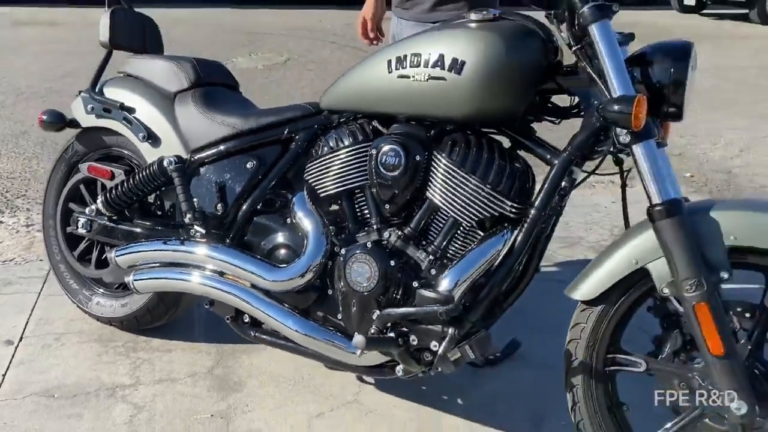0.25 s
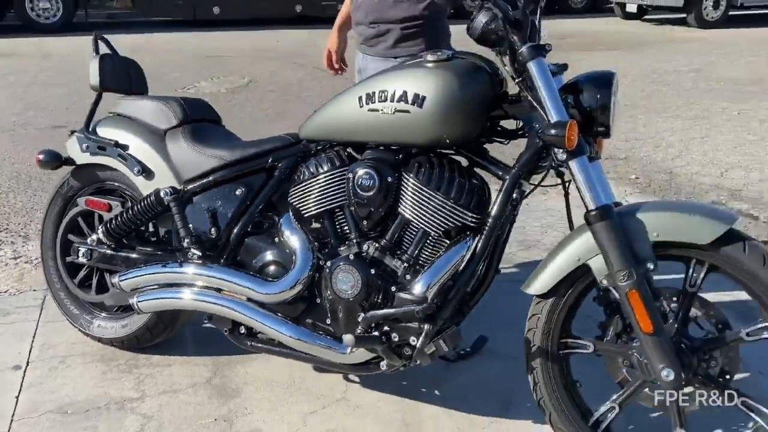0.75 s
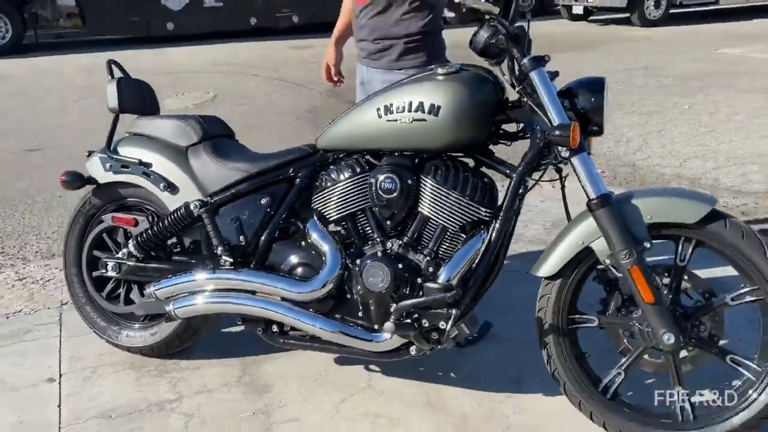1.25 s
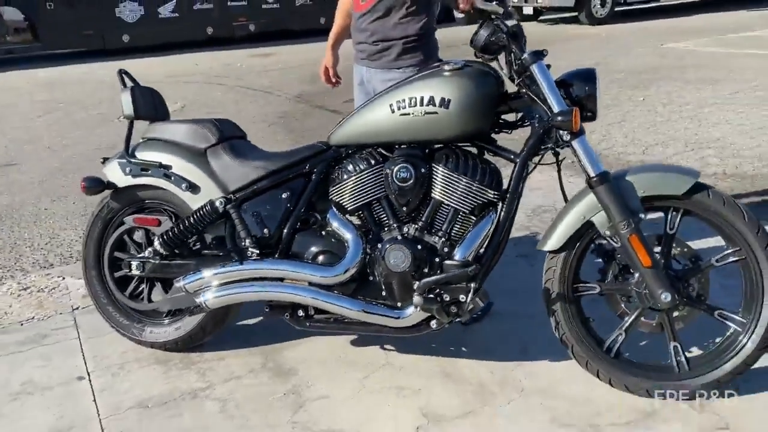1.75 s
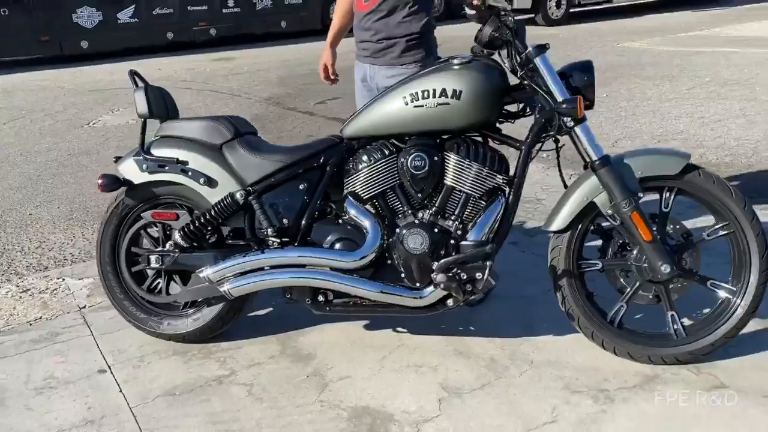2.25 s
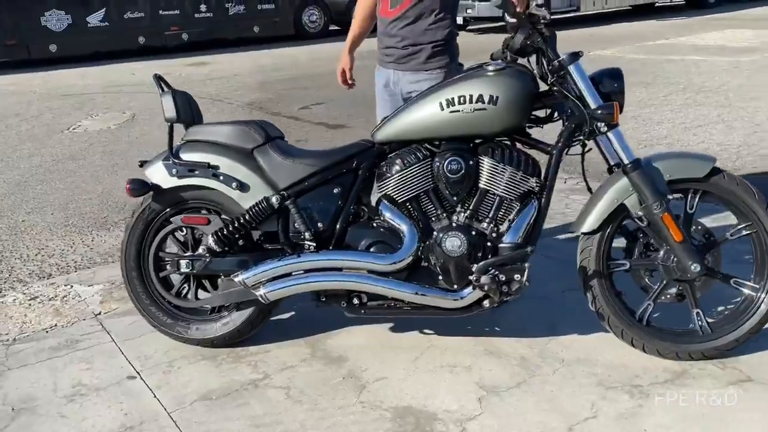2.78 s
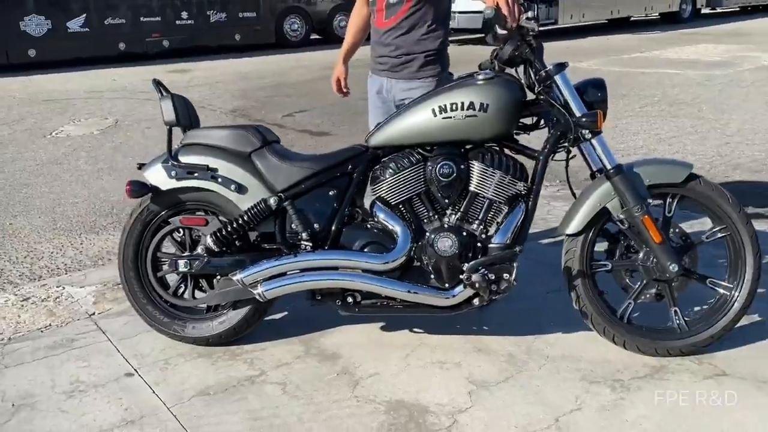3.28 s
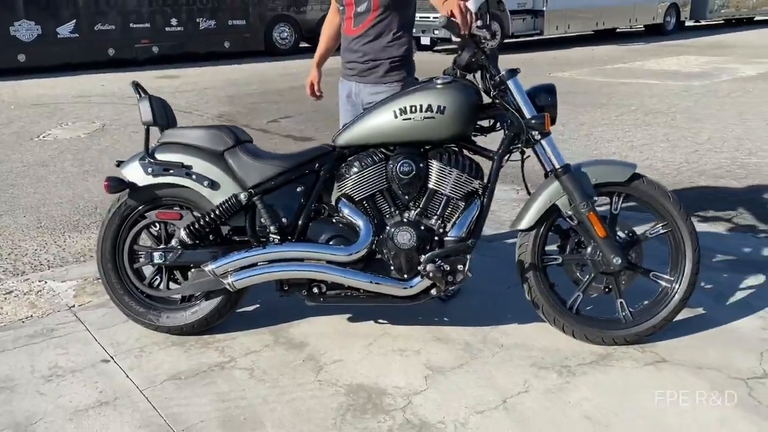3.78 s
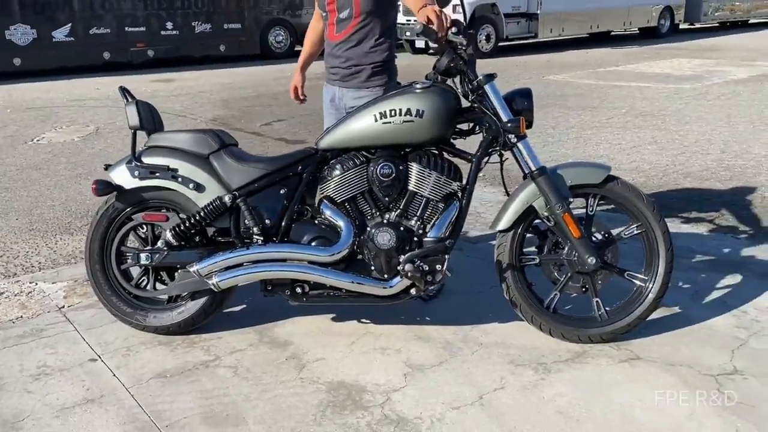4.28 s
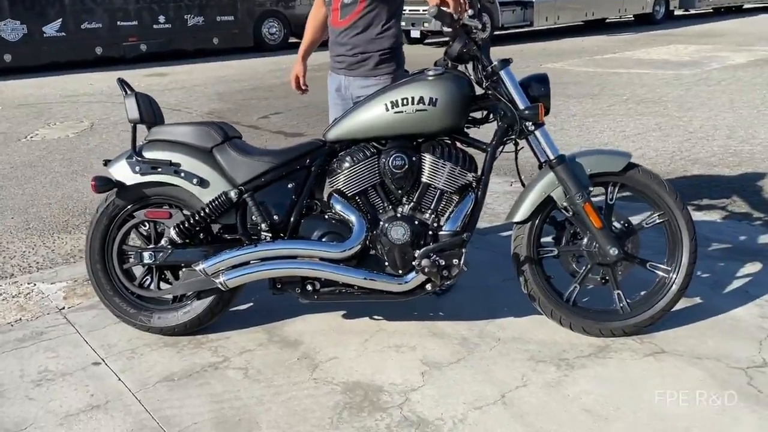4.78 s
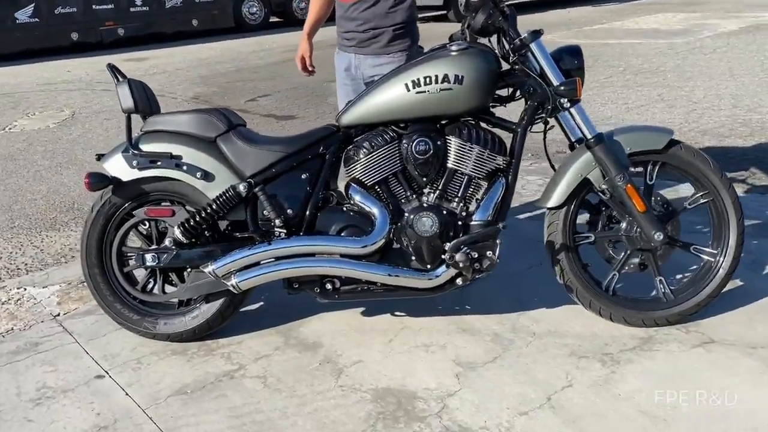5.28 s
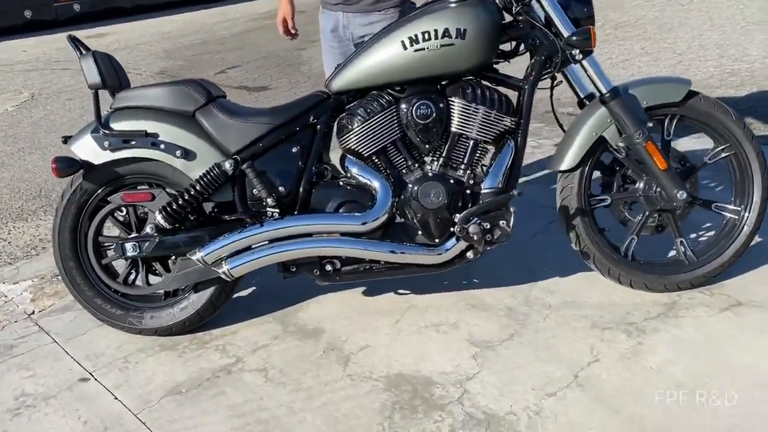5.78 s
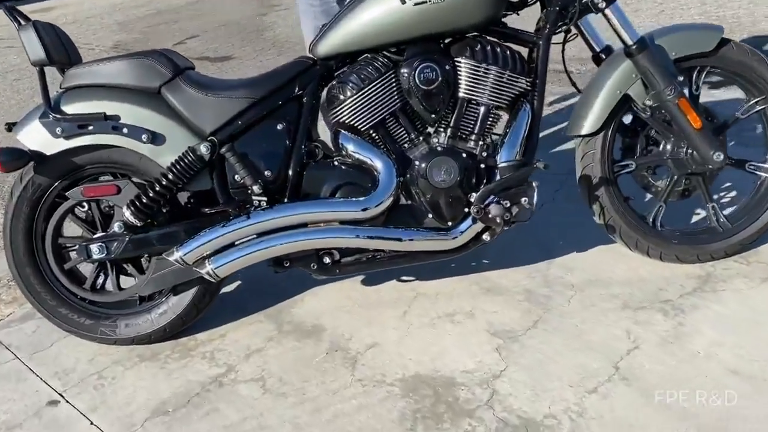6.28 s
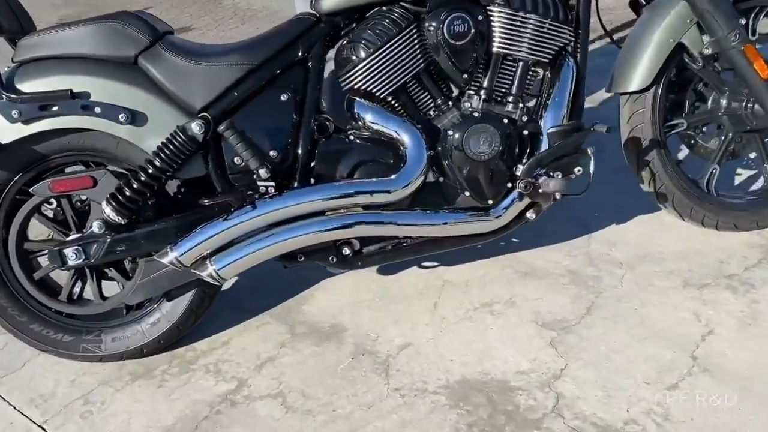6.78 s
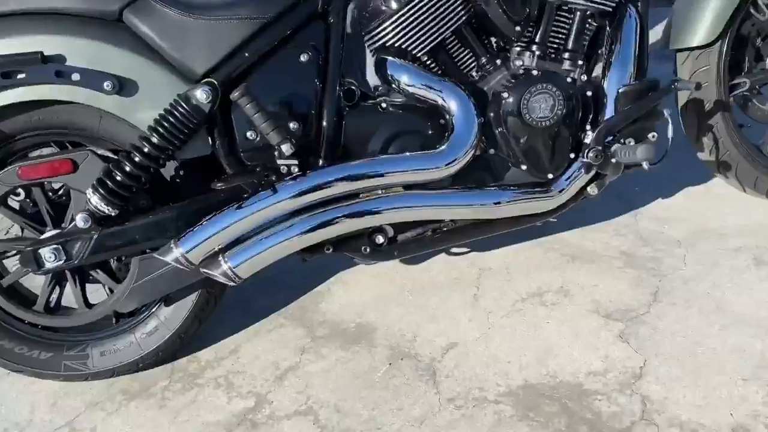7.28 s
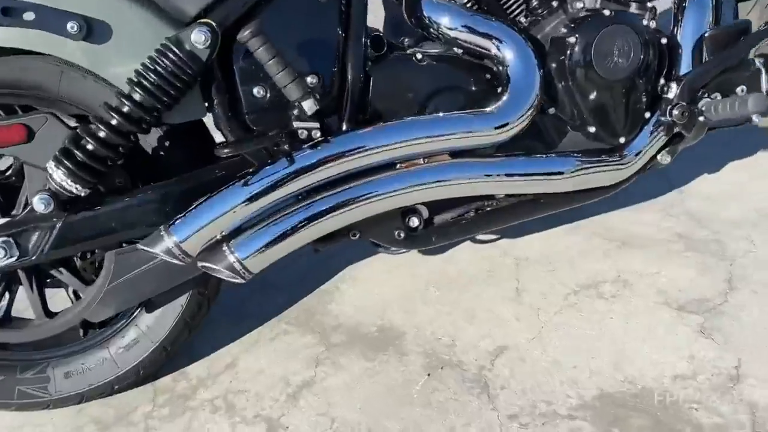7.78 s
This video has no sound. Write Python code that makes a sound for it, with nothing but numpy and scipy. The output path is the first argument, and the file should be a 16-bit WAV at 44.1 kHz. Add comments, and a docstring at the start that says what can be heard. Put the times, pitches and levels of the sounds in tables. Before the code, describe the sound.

Loud, raspy motorcycle revs in quick bursts on a concrete lot, each falling back to a soft uneven lope, the last cut off mid-bark.

```python
"""A big V-twin motorcycle with two open pipes stands on concrete, in stereo, over a faint distant street.
It lopes briefly, then barks in two quick blips, a longer one near 2 s, three close together around 4 s,
one at 5.5 s and a last at 7.6 s that is still barking at the end. Each firing rings its pipe and tears
out a burst of gas noise. Between blips the engine runs down in a soft lope, stumbling just after the
throttle shuts, with a pop after four of the blips. Parked trucks answer faintly."""
import sys
import numpy as np
from scipy import signal
from scipy.fft import rfft, irfft, next_fast_len
from scipy.io import wavfile
from scipy.ndimage import uniform_filter1d

SR = 44100
rng = np.random.default_rng(int(sys.argv[2]) if len(sys.argv) > 2 else 0)


def log_audio(samples):
    """Write samples as a 16-bit WAV file to the path given in sys.argv[1]."""
    # one column per channel
    frames = np.atleast_2d(samples).T
    # limit to full scale, then quantise
    limited = np.clip(frames, -1, 1)
    pcm = np.round(limited * 32767).astype(np.int16)
    wavfile.write(sys.argv[1], SR, pcm)


N = 354563

# throttle blips: (bark starts [s], bark ends [s], grip turns earlier by [s], twist takes [s],
# push [cycles/s per s], soft start before each layer's share [dB], stumble afterwards [s])
BLIPS = [(.2, .435, .127, .249, 109.6, 0, .145), (.615, .955, .116, .126, 84.3, 2, .205),
         (1.925, 2.42, .128, .188, 93.7, 10, .21), (3.65, 3.8, .089, .143, 90.7, 8, .17),
         (3.985, 4.145, .165, .125, 48.5, 12, .1), (4.27, 4.69, .144, .226, 87.2, 13, .19),
         (5.475, 5.99, .128, .261, 93.3, 10, .23), (7.615, 8.2, .007, .168, 109.6, 0, 0)]
# the grip is let go this long before the bark ends; time constant of the push dying away
RELEASE_S, PUSH_DIES_S = .127, .092
# engine speed in four-stroke cycles/s: at first, at idle, and the span above idle where idle control helps
FIRST_RATE, IDLE_RATE, IDLE_SPAN = 18.6, 12.8, 5.3
# what slows the crank: friction [cycles/s per s] and pumping drag [per s]
FRICTION, DRAG = 10.2, .64
# cycles from the start to the front cylinder's firing, and from there to the rear one's
FIRST_FIRING, REAR_LAG = .72, .425

# throttle open: (engine speed [cycles/s], pipe boom [dB], gas rasp [dB], hiss [dB]), before cylinder trims
OPEN_LEVELS = [(13, -17.5, -24, -26), (20, -12, -19.5, -25), (31.6, -11, -17, -25.5),
               (43.5, -11, -16.5, -26.5)]
# throttle shut: (engine speed [cycles/s], pipe boom [dB], gas rasp [dB], hiss [dB]), before trims
SHUT_LEVELS = [(13.55, -39.5, -52.5, -64), (16.07, -33, -43.5, -54.5), (19.1, -29.5, -41, -48.5),
               (30.2, -19, -32.5, -39.5), (37, -15.5, -29.5, -37.5)]
# a soft start fills to full strength in this time
FILL_S = 0.22
# share of the soft start taken by (boom, rasp, hiss) [ratio]
SOFT_SHARE = (0.53, 0.96, 1.1)
# how far (boom, rasp, hiss) have sunk by the end of a stumble [dB]
STARVE_DB = (0, 3, 4)
# the lope by the place of the microphone: (time [s], boom [dB], gas noise [dB])
MIC_PLACE = [(0, 9, 12.5), (.7, 1, 3), (1.6, -0.5, 4), (3.4, -0.5, 2), (4.2, 0.5, 3.5), (5.4, 0, 3),
             (6.4, 1, 4), (7.3, 4.5, 7), (7.6, -1.5, -3)]
# how hot the pipe gas is under throttle: (engine speed [cycles/s], heat [0-1])
OPEN_HEAT = [(16, 0.22), (26, 0.86), (35, 0.83)]
# the same while stumbling, before it cools: (engine speed [cycles/s], heat [0-1])
STUMBLE_HEAT = [(22, 0.071), (30, 0.65), (40, 1)]
# the same when coasting: (engine speed [cycles/s], heat [0-1])
SHUT_HEAT = [(15, 0.009), (24, 0.038), (40, 0.47)]

# standing waves of each pipe, hot and cool: (frequency [Hz], width [Hz], relative level [dB])
FRONT_HOT = [(82.8, 136, -6.5), (132, 46.7, 6.5), (178, 63.4, 4.5), (356, 99, -8), (497, 49, -17.5),
             (920, 330, -22), (1220, 250, -32), (1510, 50, -39)]
REAR_HOT = [(73.3, 53.5, -3.5), (108.2, 64.5, 0), (222, 58, -1.5), (318, 47, -6.5), (475, 35, -15.5),
            (852, 20, -14.5), (1064, 84, -22.5), (1640, 62, -18)]
FRONT_COOL = [(95.8, 16.1, 2.5), (164.2, 35, -3.5), (278.3, 28, -10.5), (318, 97, -29)]
REAR_COOL = [(88.4, 16.3, 1), (169.4, 25.7, -5), (194, 27, -6.5), (280, 53, -16)]

# colour of turbulent gas under throttle: (frequency [Hz], relative density [dB per Hz])
RASP = [(100, -32.5), (300, 6.5), (450, -1.5), (630, -5.5), (870, 1), (1050, 2), (1250, -2), (1530, 5),
        (1800, -3), (2400, -4), (3200, -22.5), (6000, -79.5)]
# colour of the soft gas with the throttle shut: (frequency [Hz], relative density [dB per Hz])
SOFT_RASP = [(100, -48.5), (300, 9), (420, -5), (620, -5), (880, -1.5), (1150, -0.5), (1450, -1),
             (1750, -2.5), (2050, -4), (2500, -12), (3300, -17), (6000, -49)]
# colour of the gas hiss: (frequency [Hz], relative density [dB per Hz])
HISS = [(1200, -19), (2400, -5.5), (3300, -0.5), (4400, 0.5), (5400, -1.5), (6200, -6), (7500, -4),
        (8400, -14), (9500, -6.5), (13000, -11.5), (14500, -12.5), (16000, -18)]
# afterfire in the pipes: (time [s], peak level before trim [dB])
POPS = [(0.491, -14.5), (2.439, -7), (4.86, -10.5), (6.226, -23)]

# between the two microphones: (frequency [Hz], left leads by [rad])
MIC_LEAD = [(150, 0), (600, .3), (1210, .9), (2500, 3.3), (3270, 6.8), (6720, 6.4), (7840, 3.7), (9390, .5),
            (12900, 0), (14600, -2.5)]
# between the two microphones: (frequency [Hz], left over right [dB])
MIC_TILT = [(380, -0.5), (700, 2.5), (1290, -1), (2380, -1), (4400, 10), (8100, -0.5), (15000, 0.5)]
# between the two microphones: (frequency [Hz], likeness [0-1])
MIC_LIKENESS = [(300, 1), (1000, 0.96), (2000, 0.67), (4000, 0.4), (12000, 0.43)]
# echo around the yard: (frequency [Hz], time to fall 60 dB [s])
YARD_DECAY = [(100, 0.028), (1500, 1), (12000, 0.27)]
# colour of the distant street: (frequency [Hz], relative density [dB per Hz])
STREET = [(25, 2.5), (70, -22), (140, 8.5), (400, -20), (1000, -10.5), (4000, -35), (15000, -47)]
TOP_HZ = 16100  # band limit of the recorder


def engine_speed():
    """Cycles/s every millisecond: throttle pushes the flywheel, friction and drag run it down to idle."""
    t = np.arange(N * 1000 // SR + 2) / 1000
    push = np.zeros(len(t))
    for start, end, early, twist, force, _, _ in BLIPS:
        opening = np.clip((t - start + early) / twist, 0, 1)
        closing = np.exp(-np.maximum(t - end + RELEASE_S, 0) / PUSH_DIES_S)
        push += force * opening * closing
    rate, rates = FIRST_RATE, []
    for force in push:
        idle_control = min(1, (rate - IDLE_RATE) / IDLE_SPAN)
        rate += (force - (FRICTION + DRAG * rate) * idle_control) * t[1]
        rates.append(rate)
    return t, np.array(rates)


def firings(rear):
    """Times and cycle rates at which one cylinder fires; the uneven spacing of the two gives the lope."""
    t, rate = engine_speed()
    crank = np.cumsum(rate) * t[1] - FIRST_FIRING - REAR_LAG * rear
    times = np.interp(np.arange(np.ceil(crank[0]), crank[-1]), crank, t)
    return times, np.interp(times, t, rate)


def pulling(rear, boom_db, rasp_db, hiss_db):
    """One cylinder under throttle: the boom of its pipe, and the power of its rasp and hiss."""
    times, rate = firings(rear)
    on = within(times, BLIPS)
    times, rate = times[on], rate[on]
    boom, rasp, hiss = levels(rate, OPEN_LEVELS) - np.outer(SOFT_SHARE, softness(times))
    # chance differences between firings: timing, boom, all gas, hiss alone
    timing_luck, boom_luck, gas_luck, hiss_luck = rng.standard_normal((len(times), 4)).T
    gap = SR / (2 * rate)  # samples for each firing
    start = times - .002 + .00005 * timing_luck
    size = amp(boom + boom_db + .7 * boom_luck) * np.sqrt(gap)
    heat = levels(rate, OPEN_HEAT)[0]
    sound = booming(rear, start, size, heat, hot_db=0.9, cool_db=6)
    burst = blowdown(rise=0.00067, linger=0.0019, share=0.57)
    rasp_energy = amp(rasp + rasp_db + 0.46 * gas_luck) ** 2 * gap
    hiss_energy = amp(hiss + hiss_db + 0.66 * gas_luck + 0.68 * hiss_luck) ** 2 * gap
    rasp_power = strike(times - .0052, rasp_energy, burst)
    hiss_power = strike(times - .0046, hiss_energy, burst)
    return np.array([sound, rasp_power, hiss_power])


def coasting(rear, boom_db, rasp_db, hiss_db):
    """One cylinder, throttle shut: round pulses and the power of soft puffs, uneven while it stumbles."""
    times, rate = firings(rear)
    off = ~within(times, BLIPS)
    times, rate = times[off], rate[off]
    starved = stumble(times)
    near_boom, near_gas = levels(times, MIC_PLACE)
    near = [near_boom, near_gas, near_gas]
    boom, rasp, hiss = levels(rate, SHUT_LEVELS) + near - np.outer(STARVE_DB, starved)
    timing_luck, boom_luck, gas_luck, hiss_luck = rng.standard_normal((len(times), 4)).T
    uneven = np.where(starved > 0, 1, .15)
    gap = SR / (2 * rate)  # samples for each firing
    size = amp(boom + boom_db + 1.8 * uneven * boom_luck) * np.sqrt(gap)
    start = times - .0014 - .0004 * rear + .0002 * uneven * timing_luck
    stumble_heat = (1 - 0.12 * starved) * levels(rate, STUMBLE_HEAT)[0]
    heat = np.where(starved > 0, stumble_heat, levels(rate, SHUT_HEAT)[0])
    sound = booming(rear, start, size, heat, hot_db=-4.5, cool_db=1.6)
    puff = blowdown(rise=0.00096, linger=0.0036, share=0.32)
    gas_db = (1 + 1.2 * uneven) * gas_luck
    rasp_energy = amp(rasp + rasp_db + gas_db) ** 2 * gap
    hiss_energy = amp(hiss + hiss_db + gas_db + 0.93 * hiss_luck) ** 2 * gap
    rasp_power = strike(times - .006, rasp_energy, puff)
    hiss_power = strike(times - .006, hiss_energy, puff)
    return np.array([sound, rasp_power, hiss_power])


def within(times, spans):
    """Which times fall inside any of the spans."""
    return np.any([(times >= a) & (times <= b) for a, b, *_ in spans], axis=0)


def softness(times):
    """How many dB the firings lack while the cylinders fill at the start of a blip."""
    lack = 0
    for start, end, *_, soft, _ in BLIPS:
        unfilled = np.clip(1 - (times - start) / FILL_S, 0, 1)
        lack = lack + soft * unfilled * within(times, [(start, end)])
    return lack


def stumble(times):
    """Runs from 0 to 1 while the mixture burns unevenly after a blip; 0 at other times."""
    return sum(np.interp(times, [end, end + length], [0, 1], left=0, right=0)
               for _, end, *_, length in BLIPS)


def booming(rear, times, sizes, heat, hot_db, cool_db):
    """The pulses of one cylinder ring its pipe, blending its hot and cool standing waves by heat."""
    hot, cool = (REAR_HOT, REAR_COOL) if rear else (FRONT_HOT, FRONT_COOL)
    heat = np.clip(heat, 0, 1)
    hot_ring = strike(times, sizes * heat * amp(hot_db), pipe(hot))
    cool_ring = strike(times, sizes * (1 - heat) * amp(cool_db), pipe(cool))
    return hot_ring + cool_ring


def pipe(modes, size=16384):
    """Impulse response of energy 1 of an open pipe; its small mouth radiates little deep bass."""
    f = np.fft.rfftfreq(size, 1 / SR)
    waves = 0
    for k, (hz, width, db) in enumerate(modes):
        resonance = 1j * f * width / (hz * hz - f * f + 1j * f * width)
        waves = waves + (-1) ** k * amp(db) * resonance  # neighbouring modes have opposite sign
    mouth = (f * f / (51 ** 2 - f * f + 44j * f)) ** 2
    soft = 1 / (1 + 1j * f / (2 * modes[-1][0])) ** 2  # treble rolls off above the last mode
    h = irfft(waves * mouth * soft)
    return h / np.linalg.norm(h)


def blowdown(rise, linger, share):
    """Power of one gas burst, area 1: a quick swell as the valve opens, then the rest of the stroke."""
    t = np.arange(SR // 8) / SR
    burst = t ** 5 * np.exp(-t / rise)
    rest = t ** 3 * np.exp(-t / linger)
    return (burst / burst.sum() + share * rest / rest.sum()) / (1 + share)


def strike(times, sizes, response):
    """One copy of the response at each time."""
    at = np.clip(np.round(times * SR).astype(int), 0, N)
    return signal.fftconvolve(np.bincount(at, sizes, N + 1), response)[:N]


def jet(power, spectrum, grain_db, patchy_db=2):
    """Stereo gas noise that follows a power curve; grain makes it crackle."""
    # each grain holds its level for 16 samples
    grain = amp(grain_db * np.repeat(rng.standard_normal(N // 16 + 1), 16)[:N])
    grain = grain / np.sqrt(np.mean(grain ** 2))
    source = eddies(rng.standard_normal((2, N)), patchy_db) * np.sqrt(np.abs(power)) * grain
    source = signal.fftconvolve(source, ring(spectrum)[None], axes=1)[:, :N]

    def mid_side_gains(hz):
        turn = np.arccos(np.clip(along(MIC_LIKENESS, hz), -1, 1)) / 2
        return np.array([np.cos(turn), np.sin(turn)])

    mid, side = filtered(source, mid_side_gains)
    return heard(np.array([mid + side, mid - side]))


def eddies(noise, patchy_db):
    """Turbulence varies in patches of time and frequency, so every puff gets a colour of its own."""
    z = signal.stft(noise, nperseg=512)[2]
    field = rng.standard_normal(z.shape[1:])
    field = uniform_filter1d(uniform_filter1d(field, size=5, axis=0), size=4, axis=1)
    gain = amp(patchy_db * field / field.std())
    gain = gain / np.sqrt(np.mean(gain ** 2))
    return signal.istft(z * gain, nperseg=512)[1][:, :N]


def ring(spectrum, size=16384):
    """Causal impulse response of energy 1 with the given spectrum, minimum phase by its cepstrum."""
    cepstrum = irfft(np.log(amp(along(spectrum, np.fft.rfftfreq(size, 1 / SR)))))
    cepstrum[1:size // 2] *= 2
    cepstrum[size // 2 + 1:] = 0
    h = irfft(np.exp(rfft(cepstrum)))
    return h / np.linalg.norm(h)


def heard(sound):
    """The two microphones pick up each band at their own level and moment."""
    ears = np.array([[.5], [-.5]])  # left and right take half the difference each

    def response(hz):
        return amp(ears * along(MIC_TILT, hz)) * np.exp(1j * ears * along(MIC_LEAD, hz))

    return filtered(sound, response)


def afterfire():
    """Unburnt fuel pops in a pipe: a thud of its standing waves with a crack and spit of gas."""
    times, db = np.transpose(POPS)
    energy = amp(db - 8.5) ** 2 * SR * 0.0018
    gas = strike(times - .001, energy, blowdown(rise=0.00036, linger=0.0008, share=0.05))
    thud = strike(times, np.sqrt(energy) * amp(9), pipe(REAR_HOT))
    crack = jet(gas, RASP, grain_db=4)
    spit = jet(gas, HISS, grain_db=3)
    return thud + amp(-12) * crack + amp(-7) * spit


def yard(x):
    """Scattered echo from the trucks around: decaying noise, longest in the middle of the spectrum."""
    hz, t, z = signal.stft(rng.standard_normal((2, SR // 2)), SR, nperseg=256)
    decay = amp(-60 * t / along(YARD_DECAY, hz)[:, None])
    tail = signal.istft(z * decay, SR, nperseg=256)[1]
    late = np.pad(x, ((0, 0), (SR // 80, 0)))  # the way there and back, 12.5 ms
    return signal.fftconvolve(late, tail / np.linalg.norm(tail[0]), axes=1)[:, :N]


def distant_street():
    """Far-off street: noise of constant power, its colour mostly bass."""
    return jet(np.ones(N), STREET, grain_db=0)


def amp(db):
    """Decibels to gain."""
    return 10 ** (np.asarray(db) / 20)


def along(points, hz):
    """(frequency [Hz], value) points read on a log axis."""
    f, v = np.transpose(points)
    return np.interp(np.log(hz + 1), np.log(f), v)


def levels(at, table):
    """The other columns of a table, read along its first column."""
    first, *cols = np.transpose(table)
    return np.array([np.interp(at, first, c) for c in cols])


def filtered(x, response):
    """x times a complex response of frequency."""
    m = next_fast_len(N + SR // 2)
    return irfft(rfft(x, m) * response(np.fft.rfftfreq(m, 1 / SR)), m)[..., :N]


def scene():
    """Both pipes bark under throttle and lope without it; their gas jets merge behind the bike."""
    front = pulling(False, boom_db=-3, rasp_db=1.0, hiss_db=3.0)
    rear = pulling(True, boom_db=-2.0, rasp_db=0.5, hiss_db=0.0)
    boom, rasp, hiss = front + rear
    bark = heard(boom) + amp(-1.0) * jet(rasp, RASP, grain_db=1, patchy_db=2)
    bark = bark + jet(hiss, HISS, grain_db=1.0, patchy_db=2.5)

    front = coasting(False, boom_db=3.5, rasp_db=-1.5, hiss_db=-1.0)
    rear = coasting(True, boom_db=4, rasp_db=-1.0, hiss_db=-7.5)
    boom, rasp, hiss = front + rear
    lope = boom + jet(rasp, SOFT_RASP, grain_db=0.6, patchy_db=1.5)  # this boom is alike in both microphones
    lope = lope + jet(hiss, HISS, grain_db=3.5, patchy_db=0.5)

    bike = bark + lope + afterfire()
    return bike + amp(-31.5) * yard(bike) + amp(-40) * distant_street()


def record(dry):
    """The recorder rounds the highest peaks and keeps nothing above its band limit."""
    rounded = dry / (1 + np.abs(dry / .95) ** 6) ** (1 / 6)
    return filtered(rounded, lambda hz: 1 / (1 + (hz / TOP_HZ) ** 120))


dry = scene()
out = record(dry)
log_audio(out)
```